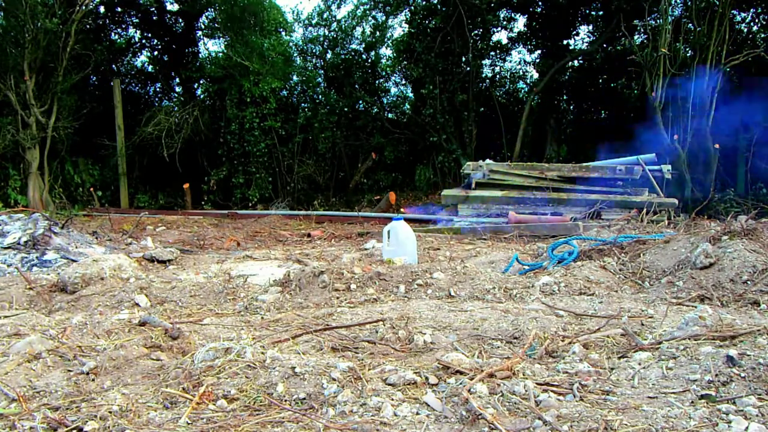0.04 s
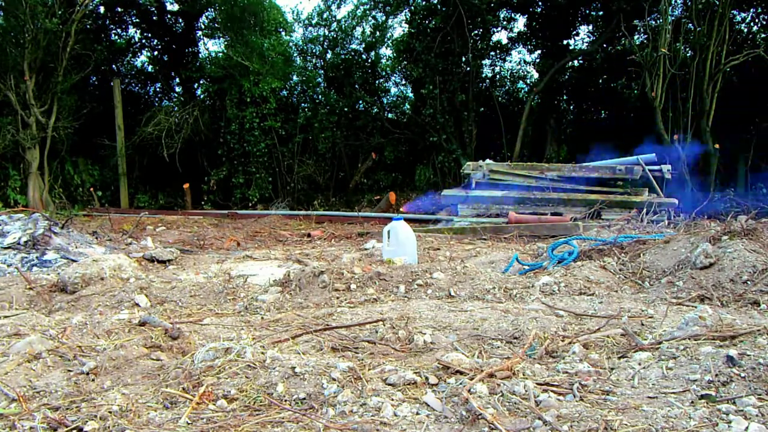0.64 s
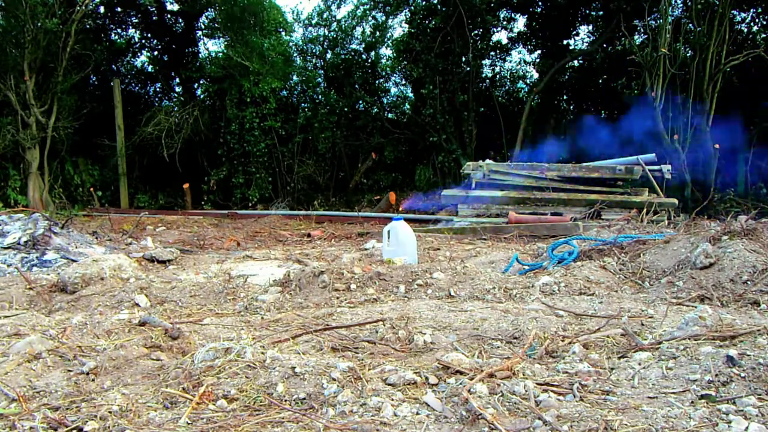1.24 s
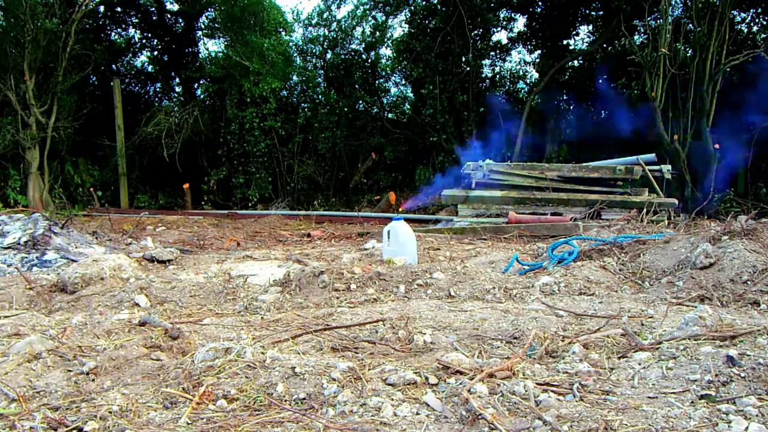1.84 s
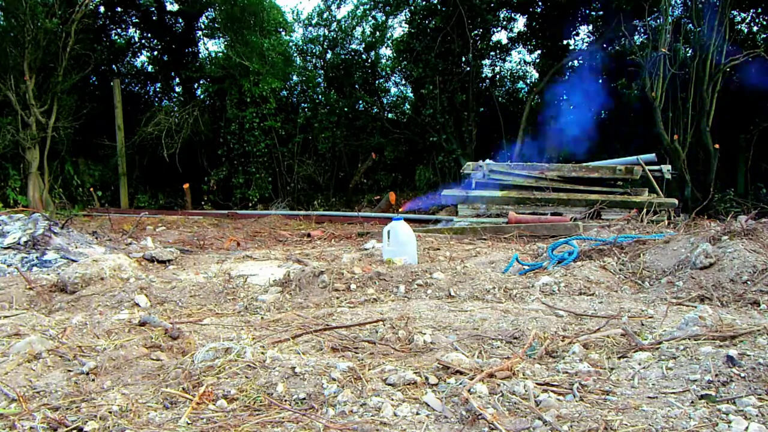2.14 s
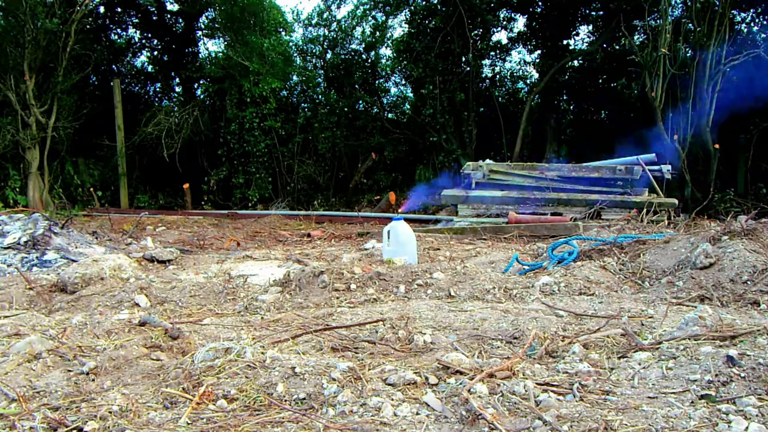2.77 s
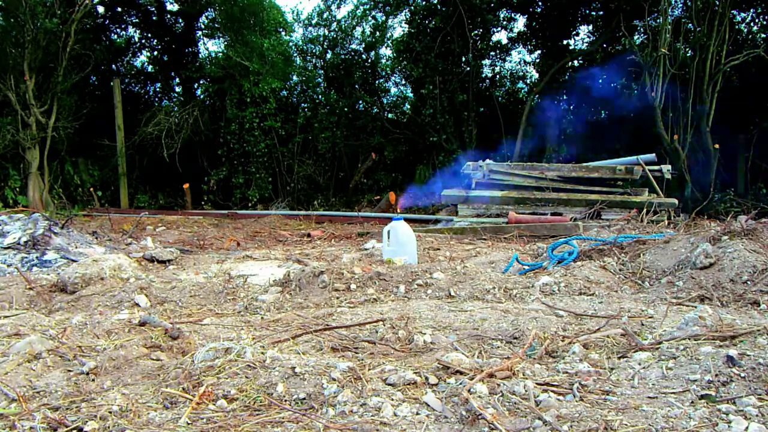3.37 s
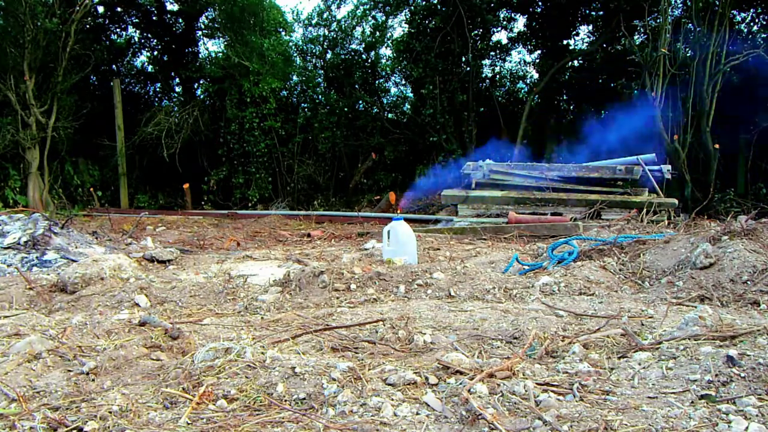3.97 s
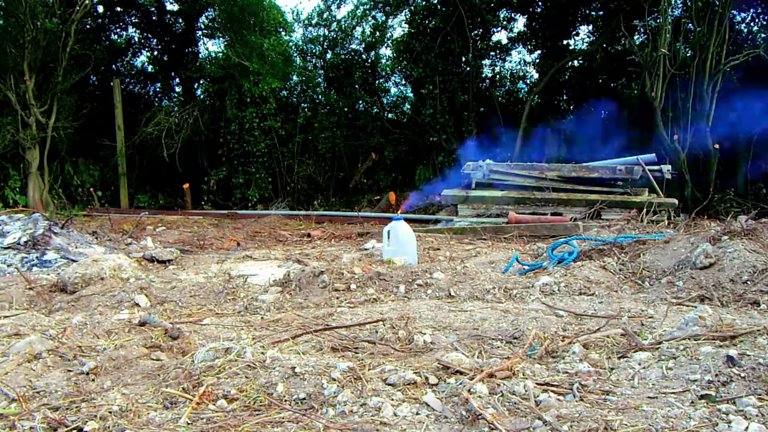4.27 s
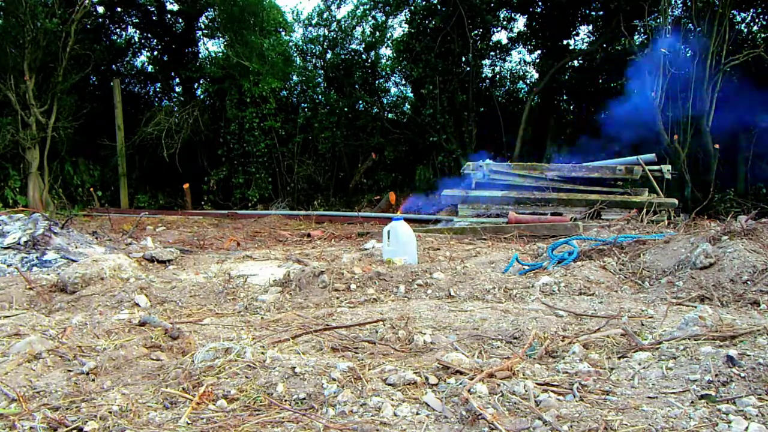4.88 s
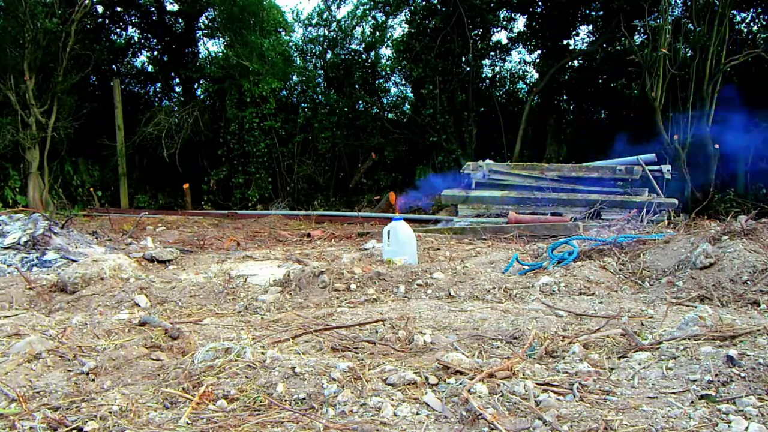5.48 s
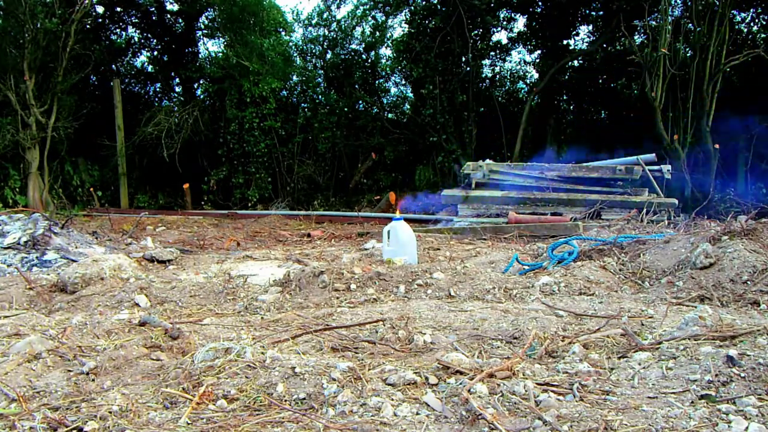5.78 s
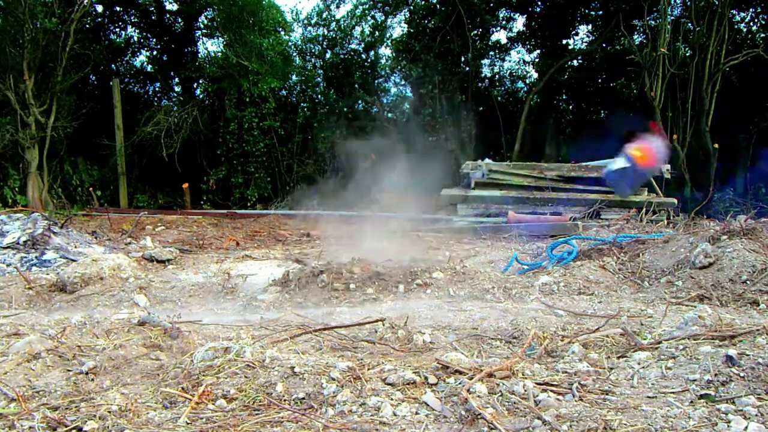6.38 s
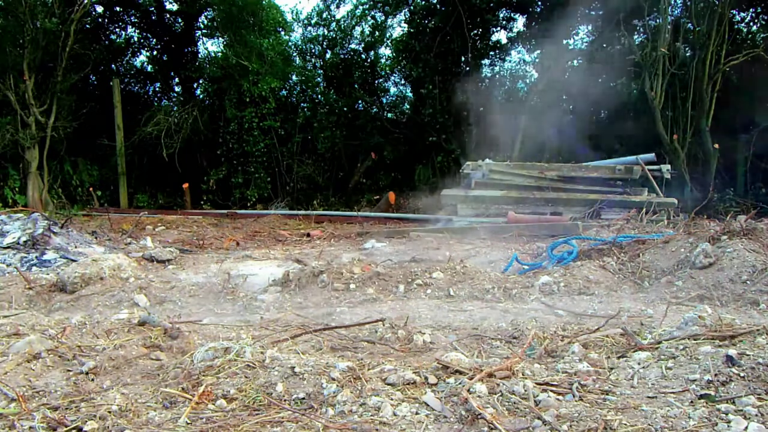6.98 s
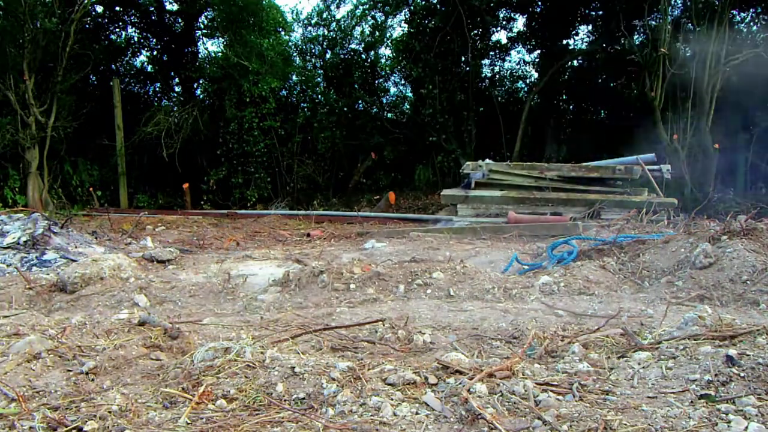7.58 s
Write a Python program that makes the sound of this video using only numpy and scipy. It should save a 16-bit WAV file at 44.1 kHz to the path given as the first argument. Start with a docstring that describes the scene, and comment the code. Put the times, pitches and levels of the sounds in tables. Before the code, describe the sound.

In a clearing among trees, a burning smoke flare sizzles with a slightly wavering hiss, and two spells of wind buffet the microphone. Suddenly a gas can bursts in a sharp, distorted blast with a brief roar and a short echo. The hiss stops. Small pieces land with dry knocks among fading spurts of escaping gas, leaving quiet open air, a faint distant hum and two barely audible bird whistles.

```python
"""A gas can bursts on open ground, after a smoke flare has hissed beside it for six seconds.
Until then the flare's jet sizzles while gusts buffet the microphone. The can's wall tears with a boom
and a crack, the blast wave pins the microphone at its limits, and the fireball's roar dies away in the
trees. Debris lands among spurts and swishes of hiss that fade as the can tumbles away,
and a bird whistles faintly over a distant hum."""
import sys
import numpy as np
from scipy import signal
from scipy.fft import rfft, irfft, next_fast_len
from scipy.io import wavfile
from scipy.ndimage import map_coordinates

SR = 44100
rng = np.random.default_rng(int(sys.argv[2]) if len(sys.argv) > 2 else 0)


def pcm_store(signal):
    """Save signal as 16-bit PCM."""
    levels = np.round(np.clip(np.atleast_2d(signal), -1, 1) * 32767)
    wavfile.write(sys.argv[1], SR, levels.astype(np.int16).T)


N = 340452
BURST_S, ROAR_S = 6.1335, 6.188  # cues: the can tears; the roar starts to decay


def amp(db):
    """Decibels to gain."""
    return 10 ** (np.asarray(db) / 20)


def unit(x):
    """Scale to rms 1."""
    return x / np.sqrt(np.mean(x ** 2) + 1e-20)


def clock():
    """The time of every sample, in seconds."""
    return np.arange(N) / SR


def eq_curve(points, hz):
    """Read (frequency, value) breakpoints on a log frequency axis."""
    freqs, values = np.transpose(points)
    return np.interp(np.log(hz + 1), np.log(freqs + 1), values)


def automation(rows, t):
    """One lane for each column after the time, read at the times t."""
    times, *lanes = np.transpose(rows)
    return [np.interp(t, times, lane) for lane in lanes]


def wobble(rate):
    """A smooth random modulator with rate knots a second."""
    return map_coordinates(rng.standard_normal(int(N * rate / SR) + 4), [clock() * rate])


def filtered(x, response):
    """Filter x with a gain given as a function of frequency."""
    size = next_fast_len(N + SR)
    return irfft(rfft(x, size) * response(np.fft.rfftfreq(size, 1 / SR)), size)[:N]


def noise(eq):
    """White noise through an EQ, scaled to rms 1: the EQ sets only its colour."""
    return unit(filtered(rng.standard_normal(N), lambda hz: amp(eq_curve(eq, hz))))


def bell(x, centre, width):
    """A Gaussian hump of height 1."""
    return np.exp(-((x - centre) / width) ** 2)


def swell(start, hold, rise, fall):
    """An envelope: exponential rise to 1 at start, hold, exponential fall."""
    t = clock()
    return np.exp(-np.maximum(start - t, 0) / rise - np.maximum(t - start - hold, 0) / fall)


def decay(start, t60):
    """A gain of 1 until start that then loses 60 dB every t60."""
    return amp(-60 * np.maximum(clock() - start, 0) / t60)


# the jet's force, and its lower rush; each rides the EQ about its own mean: t/s, level/dB
JET_FORCE = [(0.02, -40), (0.07, -38), (0.21, -46), (0.43, -44), (0.61, -47.5), (0.85, -48), (0.9, -42),
             (0.97, -48.5), (1.0, -40), (1.19, -46), (1.51, -43), (1.6, -40), (2.43, -42.5), (2.55, -36.5),
             (2.68, -44), (2.78, -39.5), (2.94, -44), (3.53, -40), (3.58, -50.5), (3.62, -40.5),
             (3.7, -43.5), (3.94, -38), (4.01, -41.5), (4.16, -39), (4.23, -42.5), (4.34, -42),
             (5.23, -45.5), (5.67, -37), (5.99, -45), (6.11, -34)]
JET_RUSH = [(0.02, -46.5), (0.05, -46), (3.24, -49), (5.4, -46.5), (6.11, -44)]
JET_EQ = [(100, -5), (220, -3.5), (550, -6.5), (850, -5.5), (1250, -12), (1650, -19), (2050, -12.5),
          (2600, -5), (3400, -2), (4200, -12), (4900, -5.5), (8000, -6), (14000, -10.5), (15800, -20)]  # base colour of the hiss: f/Hz, level/dB
JET_BELLS = [(9970, 610, 6.5), (11200, 320, -3)]  # a static peak and dip: f/Hz, width/Hz, gain/dB
JET_TILT = [(1000, 0), (3000, 0.09), (6500, 0.56), (10000, 0.62), (13000, 1.23)]  # more force is brighter: f/Hz, gain/dB per dB of force
# three sweeping EQ bells: t/s, f/Hz, gain/dB
NOZZLE_SWEEP = [(0, 6590, 3.5), (.7, 6770, 5.5), (1.5, 7600, 4), (2.05, 7900, 2), (2.15, 5200, 1.5),
                (3.2, 6200, 4.5), (4, 7200, 2.5), (4.8, 7900, 3), (5.4, 7000, -1)]  # the nozzle's resonance climbs twice as it burns
NOTCH_SWEEP = [(.3, 8000, -1.5), (1.4, 8900, -7), (2.4, 8940, -3), (3.2, 9050, -6), (4.1, 8900, 1.5),
               (6.1, 8650, -2.5)]  # a gap in the hiss deepens and fills in
SIZZLE_SWEEP = [(0, 12600, 9.5), (1.3, 12400, 9), (3.2, 12300, 8), (4.2, 12570, 11), (6.1, 12600, 10.5)]  # the sizzling resonance on top
RUMBLE_EQ = [(10, -10.5), (25, 6), (70, 4.5), (120, -4.5), (170, -12.5), (260, -31.5), (500, -69.5)]  # low end of flare, background, wind and trees: f/Hz, level/dB


def flare(hiss_db=-38, sputter_db=0.7, waver_db=0.62, rumble_db=-48.5, rush_depth=.9):
    """Jet noise over a rumble: louder and brighter with force, its colour drifting as the nozzle burns."""
    hz, t, spectrum = signal.stft(rng.standard_normal(N), SR, nperseg=512)
    hz, burning = hz[:, None], t < BURST_S
    force_db = automation(JET_FORCE, t)[0] + waver_db * np.interp(t, clock(), wobble(16))
    rush_db = automation(JET_RUSH, t)[0]
    eq_db = eq_curve(JET_EQ, hz) + sum(db * bell(hz, centre, width) for centre, width, db in JET_BELLS)
    for sweep, width_hz in ((NOZZLE_SWEEP, 900), (NOTCH_SWEEP, 430), (SIZZLE_SWEEP, 1020)):
        centre_hz, lift_db = automation(sweep, t)
        eq_db = eq_db + lift_db * bell(hz, centre_hz, width_hz)
    eq_db += eq_curve(JET_TILT, hz) * (force_db - force_db[burning].mean())
    eq_db += rush_depth * bell(hz, 4200, 1700) * (rush_db - rush_db[burning].mean())
    gain = amp(eq_db) / np.sqrt(np.mean(amp(eq_db[:, burning]) ** 2))
    jet = signal.istft(spectrum * gain, nperseg=512)[1][:N]
    hiss = jet * amp(hiss_db + sputter_db * wobble(45))
    rumble = amp(rumble_db + 2 * wobble(8)) * noise(RUMBLE_EQ)
    return hiss + rumble


AIR_EQ = [(30, -6), (150, -0.5), (250, -12.5), (600, -15.5), (1000, -20.5), (1600, -30), (3000, -26.5),
          (5000, -32.5), (12000, -31.5), (15800, -40)]  # open-air bed: f/Hz, level/dB
AIR_FADER = [(6.3, -67), (7.3, -67), (7.5, -66), (7.72, -61.5)]  # the bed lifts at the end: t/s, level/dB


def background(hum_db=-72, hum_hz=156, rumble_db=-64):
    """A bed of open air, a wavering far hum and a low rumble."""
    pitch_hz = hum_hz * (1 + 0.02 * wobble(25))
    hum = np.sqrt(2) * np.sin(2 * np.pi * np.cumsum(pitch_hz) / SR)
    rumble = amp(rumble_db + 2.5 * wobble(12)) * noise(RUMBLE_EQ)
    air = amp(automation(AIR_FADER, clock())[0]) * noise(AIR_EQ)
    return air + amp(hum_db + 3.2 * wobble(18)) * hum + rumble


GUST_CUES = [(0.523, .1, -40, -19), (0.874, .32, -38.5, -26), (0.972, .04, -29, -28),
             (1.305, .06, -34, -24), (1.392, .06, -26, -24), (1.506, 0.047, -23.5, -5.5),
             (1.568, 0.037, -19, -14), (1.667, 0.079, -27.5, -20), (1.838, .08, -29.5, -16),
             (1.967, 0.13, -28, -17), (2.175, .14, -35, -30), (3.182, .08, -46, -20),
             (4.334, 0.049, -47, -20), (4.453, 0.021, -37.5, -24), (4.955, 0.053, -19, -8.5),
             (5.044, .045, -20, -2.5), (5.126, 0.034, -18, -4), (5.235, .08, -26, -14.5),
             (5.507, .13, -23, -4.5), (5.67, .015, -24, -3), (5.71, .01, -24.5, -5),
             (5.764, 0.017, -23, -6), (5.913, 0.19, -34.5, -19), (6.869, 0.029, -50.5, -22),
             (7.46, 0.078, -53.5, -25), (7.68, .04, -49, -20)]  # buffets: t/s, hold/s, rumble level/dB, flutter re rumble/dB
FLUTTER_EQ = [(60, -10.5), (110, 5.5), (160, 4), (240, -5), (350, -15.5), (500, -26), (900, -60.5),
              (2000, -91.5)]  # the flapping above the rumble: f/Hz, level/dB
EDDY_CUES = [(1.427, -14, .0035), (1.5, -20.5, 0.0016), (1.542, -20, 0.0014), (1.679, -10.5, 0.0014),
             (5.069, -9.5, 0.002), (5.296, -18, 0.0019), (5.536, -16.5, 0.0016), (5.716, -16, 0.0026),
             (5.768, -16.5, 0.0026)]  # sharp wind thumps: t/s, level/dB, half length/s


def wind(lump_db=2.5, rise_s=0.024, fall_s=0.011):
    """Gusts rumble on the microphone; strong ones also flutter, and single eddies thump."""
    gusts = [(amp(db) * swell(s, hold, rise_s, fall_s), rel_db) for s, hold, db, rel_db in GUST_CUES]
    rumble_env = np.max([env for env, _ in gusts], axis=0)
    flutter_env = np.max([env * amp(rel_db) for env, rel_db in gusts], axis=0)
    lumps = unit(amp(lump_db * wobble(50)))
    out = lumps * (rumble_env * noise(RUMBLE_EQ) + flutter_env * noise(FLUTTER_EQ))
    for s, db, half_s in EDDY_CUES:
        u = (clock() - s) / half_s
        out += amp(db) * 2 * u / (1 + u * u) * bell(u, 0, 1.2)  # the pressure dips, then swings up
    return out


# the layers of the bang: f/Hz, level/dB
BOOM_EQ = [(100, -21), (400, -7.5), (650, -7), (900, 1.5), (1300, -11), (2500, -26.5), (8000, -53)]  # the can's wall tearing
ROAR_EQ = [(100, -4), (700, 3), (1500, -2.5), (2800, 4), (5000, -4), (8000, 1.5), (12000, 2), (14000, 0),
           (16000, 0.5)]  # the bright edge of crack and roar
SURGE_EQ = [(40, -10), (120, -0.5), (220, -1.5), (350, -8), (520, -2), (750, -6), (1200, -20.5),
            (3000, -48.5)]  # the fireball's body


def explosion(boom_db=9, crack_db=8, roar_db=0, roar_t60=0.17, surge_db=-2, surge_t60=0.15, lump_db=5):
    """The can tears with a boom and a crack; the fireball follows with a ragged roar and a low surge."""
    age = np.maximum(clock() - BURST_S, 0)
    boom_attack = np.minimum(age / 0.0023, 1)
    boom = amp(boom_db) * decay(BURST_S, t60=.12) * boom_attack * noise(BOOM_EQ)
    crack = amp(crack_db) * bell(age, 0.0078, 0.002) * noise(ROAR_EQ)
    fireball_attack = np.minimum(age / 0.01, 1) ** 3
    roar = amp(roar_db + lump_db * wobble(300)) * decay(ROAR_S, roar_t60) * noise(ROAR_EQ)
    surge = amp(surge_db) * decay(ROAR_S + 0.014, surge_t60) * noise(SURGE_EQ)
    return boom + crack + fireball_attack * (roar + surge)


BLAST_SUCTION = [(6.1425, 0), (6.144, -16), (6.174, -10), (6.177, -1.3), (6.18, -3.5), (6.183, -.7),
                 (6.19, 0)]  # the pull behind the blast front: t/s, pressure/full scale


def blast_wave(overshoot=0.64, relax_s=0.066, offset=0.26):
    """Slow pressure: deep suction, then an overshoot that relaxes to a steady offset."""
    t = clock()
    age = np.maximum(t - ROAR_S, 0)
    rebound = (t > ROAR_S) * (offset + overshoot * np.exp(-age / relax_s))
    return automation(BLAST_SUCTION, t)[0] + rebound


TREE_TAILS = [(-43, 0.2, 0.67), (-44.5, 0.21, .46), (-45.5, .18, 0.3)]  # the wood's reverb, a row each for low, mid, high: level/dB, hold/s, t60/s
# the colours of those three bands, also used for spurts and swishes: f/Hz, level/dB
LOW_EQ = [(80, -15.5), (160, 9.5), (330, -3.5), (600, 1), (900, -6.5), (1400, -16.5), (3000, -43.5)]
MID_EQ = [(700, -33.5), (1400, -16), (1900, -8), (2700, 0.5), (3500, -2), (4800, -9.5), (8000, -27.5)]
HIGH_EQ = [(3000, -21), (5500, 2.5), (8000, 1.5), (10200, -1), (12000, 0), (13500, -6.5), (15500, -21)]


def trees(build_s=.14, far_db=-53, far_t60=2.6, roll_db=-28, roll_t60=1.2):
    """Trunks and leaves scatter the bang, treble dying first; a low roll and farther woods linger."""
    bands = zip(TREE_TAILS, (LOW_EQ, MID_EQ, HIGH_EQ))
    near = sum(amp(db) * decay(ROAR_S + hold, t60) * noise(eq) for (db, hold, t60), eq in bands)
    far = amp(far_db) * decay(ROAR_S, far_t60) * noise(LOW_EQ)
    roll = amp(roll_db) * (clock() > ROAR_S) * decay(ROAR_S, roll_t60) * noise(RUMBLE_EQ)
    build = np.clip((clock() - ROAR_S) / build_s, 0, 1)  # the bang crosses the wood
    return build * (near + far) + roll


DEBRIS_CUES = [(6.354, -38, -12, -17), (6.398, -23, -13, -16), (6.457, -32, -23, -11),
               (6.476, -37.5, -13, -21), (6.572, -44, -12, -18), (6.632, -35.5, -9, -9),
               (6.81, -39.5, -11, -10), (7.007, -51.5, -4.5, -22), (7.077, -52, -9, -26),
               (7.165, -52, -10, -20), (7.247, -50, -28, -5), (7.358, -58, -5, -26)]  # landings: t/s, level/dB, knock trim/dB, tick trim/dB
KNOCK_MODES = [(482, 7.5, 0.067), (649, 4, 0.074), (1072, -3, 0.066), (1770, -8, 0.046), (2730, -3, 0.038),
               (3480, -1, .04), (4490, -12, .03)]  # the ring of a mid-sized piece: f/Hz, level/dB, t60/s
GRIT_EQ = [(700, -8), (1700, -3), (3000, 3), (5000, -9), (8000, -5), (10500, 5), (13000, -3), (15500, -10)]  # dry grit: f/Hz, level/dB


def debris(knock_db=-6, tick_db=-1, tick_t60=0.021, attack_s=0.0011):
    """Each falling piece gives a short rough knock, pitched by its size, and a dry tick."""
    out = np.zeros(N + SR)
    t = np.arange(SR // 4) / SR
    grit = noise(GRIT_EQ)
    attack = 1 - np.exp(-t / attack_s)
    for s, db, knock_trim, tick_trim in DEBRIS_CUES:
        start = round(s * SR)
        pitch = np.exp(rng.normal(0, 0.1))
        knock = 0
        for hz, mode_db, t60 in KNOCK_MODES:
            blur = np.cumsum(rng.normal(0, 0.13, len(t)))  # rough contact blurs the pitch
            envelope = amp(mode_db + rng.normal(0, 2.2) - 60 * t / t60)
            knock += envelope * np.sin(2 * np.pi * hz * pitch * t + blur)
        tick = amp(-60 * t / tick_t60) * np.roll(grit, -start)[:len(t)]
        hit = amp(knock_db + knock_trim) * knock + amp(tick_db + tick_trim) * tick
        out[start:start + len(t)] += amp(db) * hit * attack
    return out[:N]


SPURT_CUES = [(6.46, .012, -53), (6.552, .02, -57.5)]  # spurts of hiss: t/s, hold/s, level/dB


def spurts(rise_s=.006, fall_s=0.021):
    """Short bright spurts of hiss after the bang."""
    envelope = sum(amp(db) * swell(s, hold, rise_s, fall_s) for s, hold, db in SPURT_CUES)
    return envelope * unit(noise(HIGH_EQ) + 1.1 * noise(MID_EQ) + 0.71 * noise(LOW_EQ))


SWISH_CUES = [(6.655, .02, -68, -70), (6.767, .03, -68, -76), (6.832, 0.043, -67, -65),
              (6.923, .025, -72, -79), (7.037, .07, -86, -71), (7.17, .02, -81, -83),
              (7.27, 0.023, -83, -87)]  # swishes of hiss: t/s, hold/s, crisp level/dB, dull level/dB
SWISH_EQ = [(4000, -25), (6800, -5), (8400, -9), (9600, 1), (11000, -2), (12800, -3), (15000, -17)]  # their crisp top: f/Hz, level/dB


def swishes(grain_db=4, rise_s=0.02, fall_s=0.029):
    """Brief, crisp, grainy swishes of hiss, fading as the can tumbles away."""
    crisp, dull = noise(SWISH_EQ), noise(MID_EQ)
    hiss = sum(swell(s, hold, rise_s, fall_s) * (amp(crisp_db) * crisp + amp(dull_db) * dull)
               for s, hold, crisp_db, dull_db in SWISH_CUES)
    return hiss * unit(amp(grain_db * wobble(250)))


WHISTLE_CUES = [(7.426, .055, -75), (7.67, .05, -77)]  # a far bird's calls: t/s, hold/s, level/dB


def bird(held_hz=4133, slide_hz=400, slide_s=0.0079, lead_s=.013):
    """Thin whistles that slide up and hold."""
    t, out = clock(), np.zeros(N)
    for s, hold, db in WHISTLE_CUES:
        hz = held_hz - slide_hz * np.exp(-np.maximum(t - s + lead_s, 0) / slide_s)
        phase = 2 * np.pi * np.cumsum(hz * (1 + 0.0066 * wobble(200))) / SR
        out += amp(db) * swell(s, hold, rise=0.0049, fall=.009) * np.sqrt(2) * np.sin(phase)
    return out


def scene(flicker_db=2.0):
    """The mix, in dual mono; the flare cuts out under the burst, and the tail's level flickers."""
    flare_gate = clock() < BURST_S + .01
    mono = flare_gate * flare() + wind() + explosion() + blast_wave()
    mono += (trees() + spurts()) * amp(flicker_db * wobble(130))
    mono += swishes() + debris() + bird() + background()
    return np.array([mono, mono])


def record(dry, ceiling=.43, top_hz=15850):
    """The microphone clips, its coupling bleeds off slow pressure, and the band ends steeply."""
    clipped = np.clip(dry[0], -ceiling, ceiling)
    coupling = signal.bilinear([1, 0, 0], [1, 13, 60], SR)  # high-pass near 1 Hz
    coupled = signal.lfilter(*coupling, clipped)
    out = filtered(coupled, lambda hz: 1 / (1 + (hz / top_hz) ** 200))
    return np.array([out, out])


dry = scene()
out = record(dry)
pcm_store(out)
```